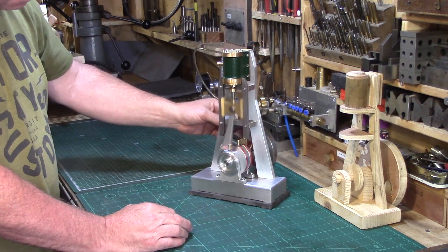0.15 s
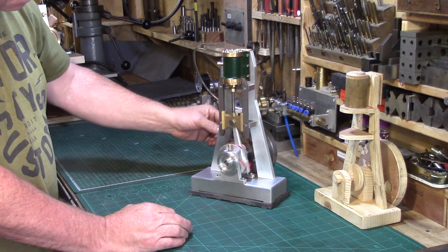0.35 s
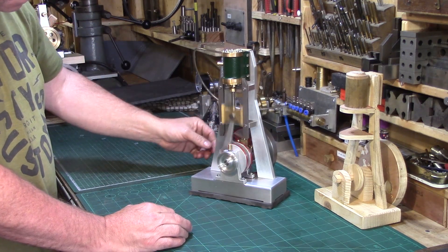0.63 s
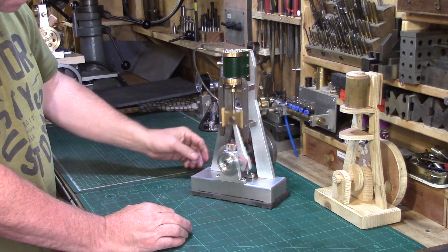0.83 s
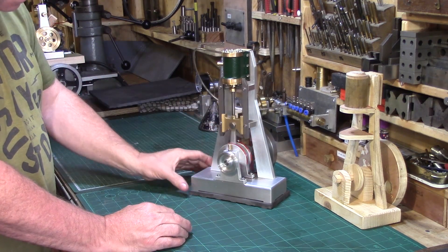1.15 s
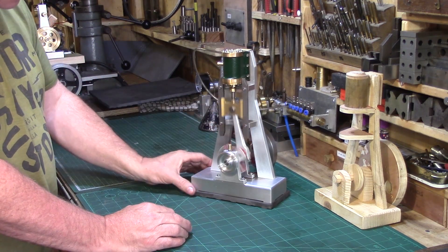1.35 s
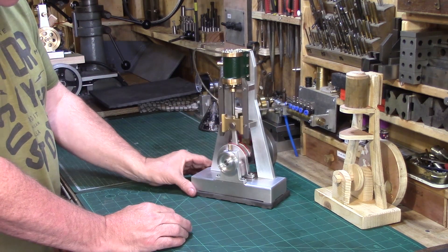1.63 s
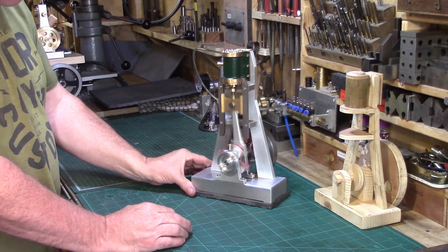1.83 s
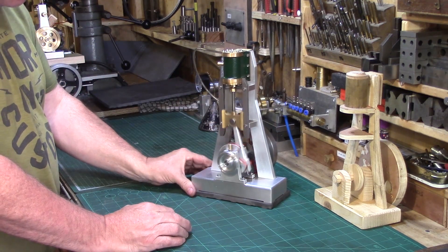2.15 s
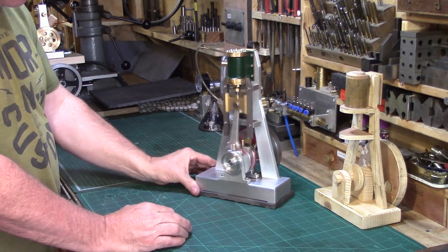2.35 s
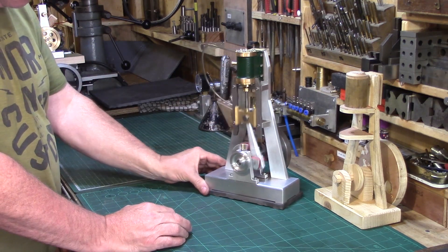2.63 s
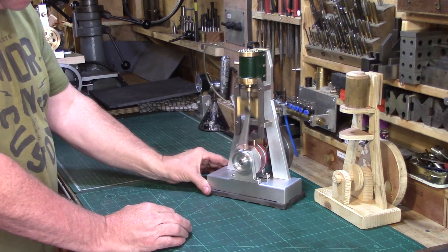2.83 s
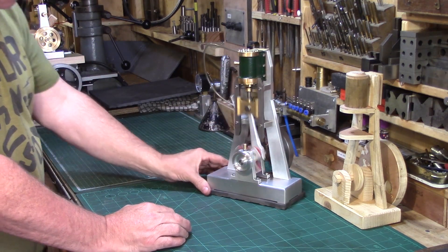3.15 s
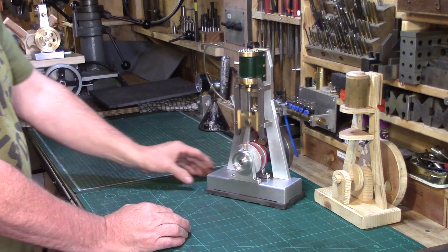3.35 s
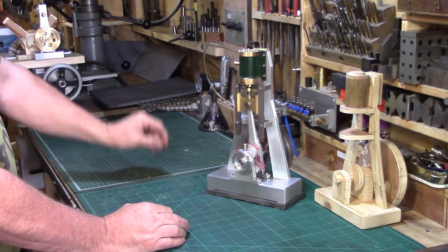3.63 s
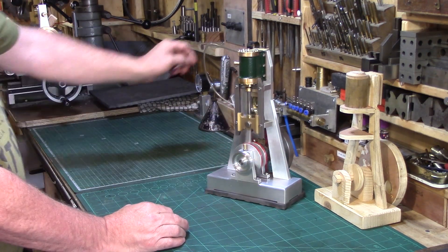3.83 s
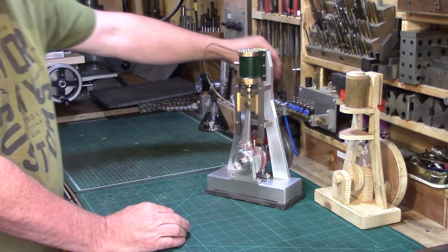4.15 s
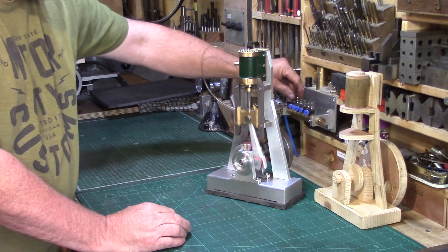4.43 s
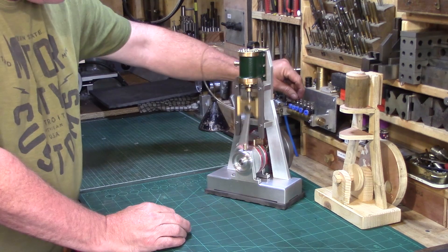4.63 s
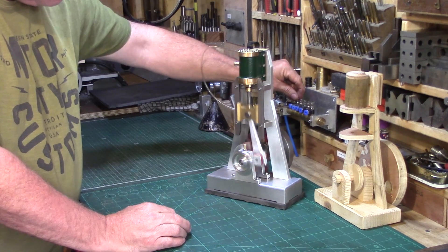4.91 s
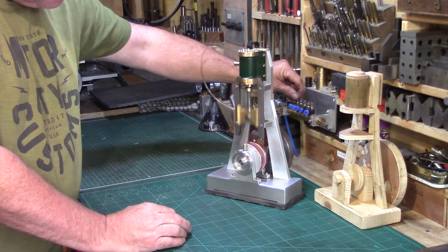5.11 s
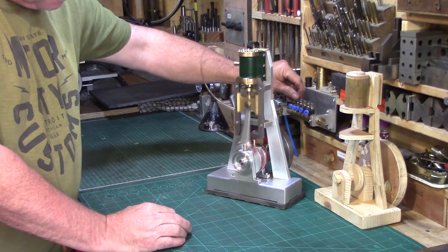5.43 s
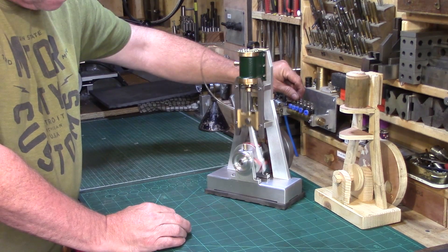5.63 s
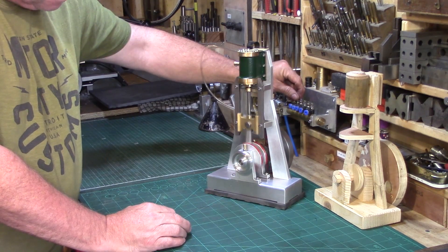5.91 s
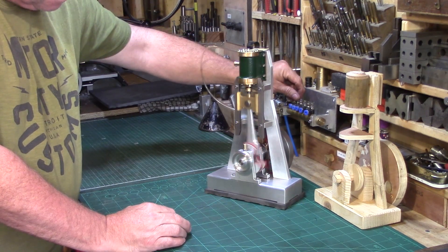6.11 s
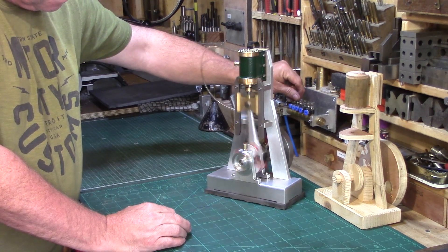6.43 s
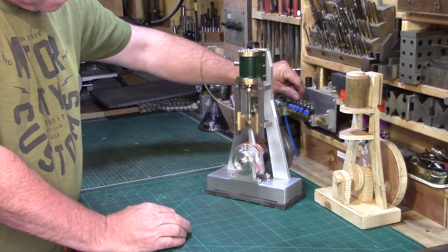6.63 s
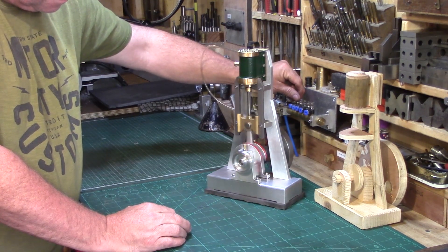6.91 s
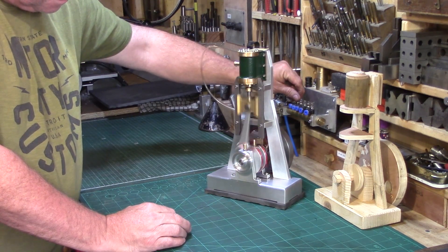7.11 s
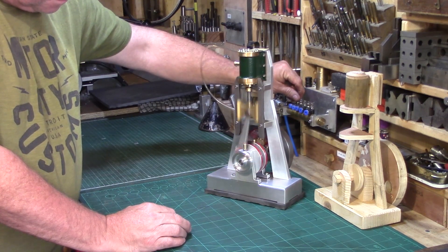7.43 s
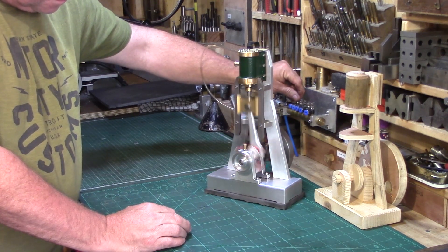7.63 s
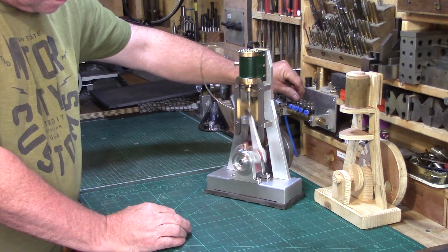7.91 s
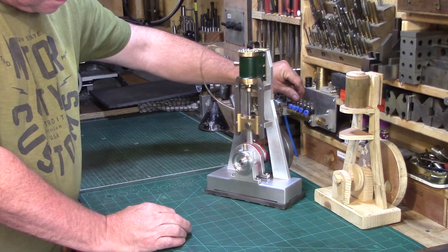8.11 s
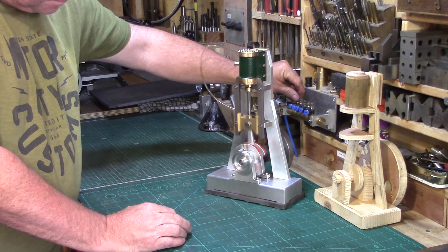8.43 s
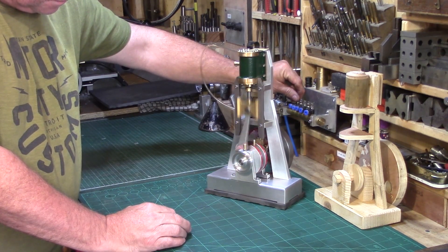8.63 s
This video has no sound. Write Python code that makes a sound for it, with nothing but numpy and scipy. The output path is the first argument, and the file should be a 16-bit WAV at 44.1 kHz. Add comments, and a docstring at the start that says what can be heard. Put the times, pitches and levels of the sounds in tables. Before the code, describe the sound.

A small model steam engine runs on compressed air throughout, close and centred on a workshop bench. It starts at about four and a half puffs a second, with a slight limp. Each puff is a sharp, high hiss with a lower chuff and a soft thump into the bench; faint rubbing and airy whistling lie between them. From about 2 seconds a loose bearing knocks lightly on every second puff. A few tiny, bright ticks occur between 1 and 4.5 seconds, and a hand softly brushes the bench near 3.2 and 3.9 seconds. At 5 seconds the beat quickens, then again just after 6, reaching nearly seven puffs a second by 7.5. The knocks are hardest between 5.6 and 6.7 seconds, then stop. The engine keeps its faster, slightly louder beat, with a faint leak and rattle, until almost 9 seconds. Nearby walls add a short reverberation.

```python
"""A small single-cylinder, double-acting model steam engine runs on compressed air and is throttled up.
It stands on a workshop bench, close to a stereo microphone and straight ahead. The crank sets the beat:
each dead centre lets out a puff (a hiss from the port, a lower chuff, a thump into the bench), then the
piston sweeps out the rest of the air with a faint whistle. The rod takes up its play once a turn,
a bearing knocks for a while, the valve leaks; close walls answer."""
import sys
import numpy as np
from scipy import signal
from scipy.fft import rfft, irfft, next_fast_len
from scipy.io import wavfile

SR = 44100
rng = np.random.default_rng(int(sys.argv[2]) if len(sys.argv) > 2 else 0)


def generate_wav(signal):
    """Clip the signal to [-1, 1] and save it as 16-bit WAV at the path in sys.argv[1]."""
    frames = np.transpose(np.atleast_2d(signal))
    scaled = np.clip(frames, -1, 1) * 32767
    pcm = np.round(scaled).astype(np.int16)
    wavfile.write(sys.argv[1], SR, pcm)


N = 386316
T = np.arange(N) / SR

# blows of the loose bearing: t/s, relative level/dB
BEARING_KNOCKS = [(2.132, -38), (2.582, -38), (3.032, -38), (3.479, -33.5), (3.932, -35), (4.388, -35),
                  (4.83, -34.5), (5.254, -34), (5.636, -26.5), (6, -28.5), (6.669, -29)]
# resonances of the exhaust port: f/Hz, width/Hz, level/dB
PORT_RESONANCES = [(5370, 57, -19), (5750, 150, -4), (6294, 89, 2.5), (6340, 26, -7), (6805, 76, 6),
                   (7300, 69, -9), (7840, 97, -4), (8300, 25, -8), (8490, 130, 5), (12400, 84, -9),
                   (14600, 89, -16), (15300, 120, -20)]
# bottom stroke, then top: hiss level/dB, hiss opening/s, chuff level/dB, chuff delay/s,
# chuff opening/s, pop level/dB, pop delay/s, thump delay/s
STROKE_SETTINGS = [(-.3, 0.0072, -8.5, 0.00056, 0.0055, -8, 0.0019, 0.00727),
                   (.3, 0.0083, -12, 0.0063, 0.013, -16, 0.0068, 0.01355)]


def amp(db):
    """Decibels to gain."""
    return np.exp(np.asarray(db) * np.log(10) / 20)


def unit(x):
    """Scale to rms 1."""
    return x / np.sqrt(np.mean(x ** 2) + 1e-20)


def along(points, hz):
    """Read (f/Hz, value) points on a log frequency axis."""
    freqs, values = np.transpose(points)
    return np.interp(np.log(hz + 1), np.log(freqs + 1), values)


def filtered(x, response):
    """Filter x by a gain given as a function of frequency."""
    size = next_fast_len(N + SR // 4, real=True)
    grid = np.fft.rfftfreq(8192, 1 / SR)
    gain = np.interp(np.fft.rfftfreq(size, 1 / SR), grid, response(grid))
    return irfft(rfft(x, size) * gain, size)[..., :N]


def highpass(x, edge_hz):
    """Steep bass cut: small parts radiate no deep bass."""
    return filtered(x, lambda hz: hz ** 4 / np.sqrt(hz ** 8 + edge_hz ** 8))


def resonances(peaks, hz, broaden=1):
    """Gain of (f/Hz, width/Hz, level/dB) resonances; rushing air broadens them."""
    return np.sqrt(sum(amp(db) ** 2 / (1 + (2 * (hz - centre) / (width * broaden)) ** 2) ** 2
                       for centre, width, db in peaks))


def noise(response):
    """Coloured noise of rms 1."""
    return unit(filtered(rng.standard_normal(N), response))


def rush(spectrum, peaks=(), peaks_db=0, broaden=1):
    """Noise of rms 1 with a (f/Hz, level/dB) spectrum, lifted at any resonant peaks."""
    return noise(lambda hz: amp(along(spectrum, hz))
                 * (1 + amp(peaks_db) * resonances(peaks, hz, broaden)))


def wobble(rate):
    """A random curve through `rate` knots a second."""
    knots = rng.standard_normal(int(N * rate / SR) + 2)
    return np.interp(T * rate, np.arange(len(knots)), knots)


def add(track, s, sound):
    """Mix a short sound into a track at time s."""
    part = track[max(round(s * SR), 0):][:len(sound)]
    part += sound[:len(part)]


def ring(modes, attack_s, scatter_db, detune):
    """One blow on a body: its modes decay, at slightly new strengths and pitches each time."""
    t = np.arange(SR // 8) / SR
    tones = 0
    for hz, db, t60 in modes:
        decay = amp(db + rng.normal(0, scatter_db) - 60 * t / t60)
        tones += decay * np.sin(2 * np.pi * hz * (1 + rng.normal(0, detune)) * t)
    return tones * (1 - np.exp(-t / attack_s))


def crack(t60):
    """A very short burst of decaying noise."""
    t = np.arange(SR // 20) / SR
    return amp(-60 * t / t60) * rng.standard_normal(len(t))


def room_tone():
    """The workshop's steady air, alike in both channels."""
    air = [(15, -46), (25, -42), (108, -0.5), (195, -11.5), (326, -4), (591, -2.5), (734, -6), (1070, -5),
           (1400, -4), (2050, -10), (2690, -9), (4740, -15), (6920, -13.5), (16000, -27.5)]  # room air spectrum: f/Hz, level/dB
    return amp(-61.5) * rush(air)


def stereo_side(engine):
    """What left and right do not share: treble scattered by shelves close by, and diffuse room air."""
    scatter_gain = [(100, -34), (300, -28), (1200, -53), (3500, -46), (5500, -14.5), (7000, -22),
                    (9000, -20), (11000, -25), (13000, -22), (15000, -29)]  # scatter off the shelves: f/Hz, level/dB
    diffuse_air = [(15, -43), (25, -12), (394, 1.5), (2700, -13), (3630, -16), (5720, -11), (8550, -23),
                   (9770, -42), (15000, -48)]  # diffuse air spectrum: f/Hz, level/dB
    shelves = crack(t60=0.086)
    scatter = signal.oaconvolve(engine, shelves / np.linalg.norm(shelves))[:N]
    return filtered(scatter, lambda hz: amp(along(scatter_gain, hz))) + amp(-72) * rush(diffuse_air)


def wall_tail():
    """A dense answer from shelves and walls, 6 ms late, each frequency dying at its own speed."""
    decay_times = [(150, 0.37), (1200, 0.23), (6000, 0.15), (9000, 0.21), (15000, 0.23)]  # reverberation: f/Hz, t60/s
    hz, t, bins = signal.stft(rng.standard_normal(SR // 2), SR, nperseg=256)
    tail = signal.istft(bins * amp(-60 * t / along(decay_times, hz)[:, None]), SR, nperseg=256)[1]
    return np.r_[np.zeros(round(.006 * SR)), tail / np.linalg.norm(tail)]


def workshop(hiss, chuff, clatter, thumps):
    """The room's answer drifts between two tails, shifting from beat to beat as parts move."""
    jet_spill = [(4500, -7), (5600, 3.5), (6300, -1), (6850, -7.5), (7500, -6), (8500, -12.5),
                 (10500, -8.5), (15000, -15)]  # the jet beams forward, the walls get a duller share: f/Hz, level/dB
    spill = filtered(hiss, lambda hz: amp(along(jet_spill, hz)))
    send = spill + amp(-5.5) * chuff + amp(-6.5) * clatter + amp(-14.5) * thumps
    drift = 2 * np.pi * .7 * T
    return sum(signal.oaconvolve(send * share, wall_tail())[:N]
               for share in (np.cos(drift), np.sin(drift)))


def mirrored(x):
    """Direct sound at the microphone plus reflections off the bench top and the nearest parts."""
    echoes = [(.0017, -15.5), (.0031, -15), (.0047, -30.5)]  # first reflections: delay/s, level/dB
    return filtered(x, lambda hz: 1 + sum(amp(db) * np.exp(-2j * np.pi * hz * delay)
                                          for delay, db in echoes))


def scuffs():
    """A hand and sleeve brush the bench, each time with a dull bump."""
    touches = [(3.188, 0.017, -49, -62), (3.943, 0.021, -49, -49)]  # brushes: t/s, half-length/s, brush level/dB, bump level/dB
    cloth = rush([(60, -25), (300, 0), (2500, 0), (5000, -4.5), (15000, -19)])
    bump = noise(lambda hz: resonances([(80, 30, -7), (156, 170, -7)], hz))
    return sum(np.exp(-((T - s) / half_length) ** 2) * (amp(brush_db) * cloth + amp(bump_db) * bump)
               for s, half_length, brush_db, bump_db in touches)


def rubbing(turns, pace):
    """Crosshead and bearings rub, louder with speed."""
    friction = [(41, -48), (70, -7), (143, 2.5), (325, -5.5), (916, -9), (1360, -17), (2450, -19.5),
                (2680, -14.5), (2980, -24), (3380, -20.5), (3690, -14), (5000, -19), (6500, -17),
                (11000, -120)]  # spectrum of the sliding parts: f/Hz, level/dB
    sweep = np.sin(2 * np.pi * turns) ** 2
    level = amp(-64 + 0.59 * sweep + 4 * wobble(40)) * pace ** 1.3
    return highpass(level * rush(friction), edge_hz=60)


def whistle(puffs, pace):
    """Air whistles faintly as the piston sweeps it out between puffs."""
    peaks = [(1380, 100, 5), (1550, 70, -4), (2780, 200, -9), (3450, 200, -12), (4300, 260, -10)]  # whistle resonances: f/Hz, width/Hz, level/dB
    puff_times = np.transpose(puffs)[0]
    stroke_phase = np.interp(T, puff_times, np.arange(len(puffs))) % 1
    outflow = abs(np.sin(np.pi * stroke_phase ** .65)) ** 1.1
    level = amp(-63 + 1.5 * wobble(13)) * outflow * pace ** .6
    return level * noise(lambda hz: resonances(peaks, hz))


def valve_leak(turns, pace):
    """Air slips past the valve and through the port, most of all after the top puff."""
    spectrum = [(3500, -35), (4900, -10), (5700, -0.5), (6850, 0), (7600, -1), (8450, -8), (9300, -8.5),
                (15000, -24)]  # leaking air: f/Hz, level/dB
    gap = amp(-19.5) + ((1 + np.cos(2 * np.pi * (turns - .76))) / 2) ** 4
    return amp(-62) * pace ** 1.54 * gap * rush(spectrum, PORT_RESONANCES, peaks_db=8)


def rattle(turns, pace, per_turn=9, idle_db=-73):
    """Pins and links touch lightly at chance points of the turn, harder with speed."""
    contacts = np.zeros(N)
    for turn in rng.uniform(turns[0], turns[-1], int(per_turn * turns[-1])):
        add(contacts, np.interp(turn, turns, T), amp(rng.normal(0, 1.65)) * crack(t60=0.032))
    peaks = [(269, 130, 4), (480, 900, 4), (680, 830, -12)]
    body = unit(filtered(contacts, lambda hz: resonances(peaks, hz)))
    return amp(idle_db) * pace ** 2.2 * body


def valve_ticks():
    """The valve gear gives a few light, bright ticks."""
    ticks = [(1.2535, -47), (2.8245, -39), (3.4254, -42), (4.3264, -40)]  # contacts in the gear: t/s, relative level/dB
    out = np.zeros(N)
    for s, db in ticks:
        add(out, s, amp(db - 10) * crack(t60=0.02))
    return highpass(out, edge_hz=2000)


def bearing_knocks():
    """A loose bearing knocks the frame, more brightly when the blow is hard."""
    frame_modes = [(625, 0.5, 0.065), (675, 2, 0.048), (560, -12.5, .035), (1290, -2, 0.018),
                   (2360, 1, 0.022)]  # the frame's ring: f/Hz, level/dB, t60/s
    body, contact, snap = np.zeros((3, N))
    typical_db = np.mean(np.transpose(BEARING_KNOCKS)[1])
    for s, db in BEARING_KNOCKS:
        hardness = db - typical_db
        frame = ring(frame_modes, attack_s=0.0011, scatter_db=1.5, detune=0.012)
        add(body, s, amp(-43.5 + 0.21 * hardness) * frame)
        add(contact, s, amp(db + .5) * crack(t60=0.017))
        add(snap, s, amp(-45 + 2.7 * hardness) * crack(t60=0.036))
    dull = [(100, -30), (400, -7), (1200, 4.5), (2600, 3), (4000, -9.5), (6000, -16.5), (15000, -20)]
    contact = filtered(contact, lambda hz: amp(along(dull, hz)))
    snap = filtered(snap, lambda hz: resonances([(3550, 980, -1), (4620, 1000, -0.5)], hz))
    return body + contact + snap


def bench_thumps(puffs, turns, pace):
    """Piston, rod and loose bearing shake the bench, harder with speed."""
    bench_modes = [(138.1, -0.5, 0.14), (162.5, 3, 0.079), (214, -4, 0.093), (262.6, -10, 0.16)]  # the bench's ring: f/Hz, level/dB, t60/s
    play_turns, bump_lead_turns = .343, .105
    out = np.zeros(N)

    def thump(s, db, attack_s):
        add(out, s, amp(db) * ring(bench_modes, attack_s, scatter_db=1.5, detune=.055))

    for s, _, top in puffs:  # the piston's reversal is a firm blow
        thump(s + STROKE_SETTINGS[top][-1], db=-42.5, attack_s=.003)
    for s in np.interp(np.arange(play_turns, turns[-1]), turns, T):  # the rod takes up its play softly
        thump(s, db=-42.5, attack_s=.009)
    for s, _ in BEARING_KNOCKS:  # the bearing bumps first, then its knock reaches the bench
        bump_turn = np.interp(s, T, turns) - bump_lead_turns
        thump(np.interp(bump_turn, turns, T), db=-48, attack_s=.0019)
        thump(s + .0052, db=-48, attack_s=.0025)
    return highpass(out * pace ** .7, edge_hz=131)


def crank(idle_turns_per_s=2.2, first_beat_s=.209):
    """Turns done since the first beat, and the pace (speed over idle speed)."""
    speeds = [(0, 2.228), (1.39, 2.262), (1.54, 2.231), (4.94, 2.211), (5.13, 2.506), (5.8, 2.796),
              (6.15, 2.683), (6.39, 3.144), (7.56, 3.396), (8.26, 3.254), (8.76, 3.276)]  # idling, then the air valve opens in two steps: t/s, speed/(turns/s)
    speed = np.interp(T, *np.transpose(speeds))
    turns = np.cumsum(speed) / SR
    return turns - np.interp(first_beat_s, T, turns), speed / idle_turns_per_s


def beats(turns, pace):
    """Two puffs a turn: rows of (t/s, pace, 0 for bottom or 1 for top)."""
    stroke = np.arange(int(2 * turns[-1]) + 1)
    top, paces = stroke % 2, np.interp(stroke / 2, turns, pace)
    limp_turns = .0451 * paces ** -1.743  # the top puff is early; the flywheel evens this out at speed
    times = np.interp(stroke / 2 - top * limp_turns, turns, T)
    return list(zip(times, paces, top))


def blowdown(flow, s, db, opening_s, emptying_s):
    """Add a burst of flow peaking at time s: the port snaps open, then the cylinder empties."""
    t = np.arange(-SR // 25, SR // 15) / SR
    burst = np.exp(-np.where(t < 0, abs(t / opening_s) ** 3.93, abs(t / emptying_s) ** 2.04))
    add(flow, s + t[0], amp(db) * burst)


def exhaust(puffs):
    """Each puff hisses in the port and chuffs in the passages, with a short pop at its pressure peak."""
    strength = [(0, -30), (.9, -30.5), (1.6, -29), (4.65, -28.5), (5.05, -27), (5.55, -27.5), (6.5, -27),
                (7, -26), (7.9, -26), (8.25, -28), (8.76, -26.5)]  # strength of the puffs: t/s, level/dB
    jet_spectrum = [(2650, -37), (4500, -34.5), (4870, -17), (5530, -6.5), (5990, -14), (6990, 0.5),
                    (7820, -2.5), (8690, -5), (9460, -15.5), (11000, -28.5), (12400, -15), (13500, -14.5),
                    (14200, -18), (14900, -8), (16000, -32)]  # the exhaust jet: f/Hz, level/dB
    chuff_spectrum = [(180, -12), (300, -8), (760, -8), (1120, -2), (1860, -3), (2250, -4.5), (3510, 0),
                      (4050, -7.5), (5000, -5.5), (6500, 3.5), (11000, -120)]  # air in the passages: f/Hz, level/dB
    passages = [(1020, 55, -6.5), (1213, 100, -4.5), (1385, 50, -3), (1550, 47, -4), (1818, 37, -2.5),
                (2480, 43, -2.5), (3490, 70, -6), (4330, 94, -1)]  # their resonances: f/Hz, width/Hz, level/dB
    hiss_flow, chuff_flow, pop_flow = np.zeros((3, N))
    for s, pace, top in puffs:
        hiss_db, hiss_rise, chuff_db, chuff_delay, chuff_rise, pop_db, pop_delay, _ = STROKE_SETTINGS[top]
        blast_db = np.interp(s, *np.transpose(strength)) + rng.normal(0, .23)
        body_db = blast_db + 2.4 * np.log10(pace)  # chuff and pop grow with speed
        slowness = pace ** -.099  # a faster valve opens more sharply
        blowdown(hiss_flow, s, blast_db + hiss_db, hiss_rise * slowness, emptying_s=.0096)
        blowdown(chuff_flow, s + chuff_delay, body_db + chuff_db, chuff_rise * slowness, emptying_s=.012)
        blowdown(pop_flow, s + pop_delay, body_db + pop_db, opening_s=.0016, emptying_s=.0025)
    hiss = rush(jet_spectrum, PORT_RESONANCES, peaks_db=4, broaden=1.9)
    chuff = rush(chuff_spectrum, passages, peaks_db=2.5, broaden=2.4)
    pop = rush([(100, -17), (400, -4), (1600, -2.5), (4000, -12), (9000, -19)])
    return hiss_flow * hiss, chuff_flow * chuff + pop_flow * pop


def scene():
    """The engine stands straight ahead of the microphone; only the room gives a little width."""
    turns, pace = crank()
    puffs = beats(turns, pace)
    hiss, chuff = exhaust(puffs)
    clatter = bearing_knocks() + valve_ticks() + rattle(turns, pace)
    thumps = bench_thumps(puffs, turns, pace)
    bed = rubbing(turns, pace) + whistle(puffs, pace) + valve_leak(turns, pace) + room_tone()
    room = workshop(hiss, chuff, clatter, thumps)
    engine = highpass(mirrored(hiss + chuff) + clatter + thumps + room, edge_hz=63)
    mid = engine + scuffs() + bed
    side = stereo_side(engine)
    return np.array([mid + side, mid - side])


def record(dry):
    """The microphone chain passes nothing above its band limit."""
    limit_hz = 15850
    return filtered(dry, lambda hz: hz < limit_hz)


dry = scene()
out = record(dry)
generate_wav(out)
```